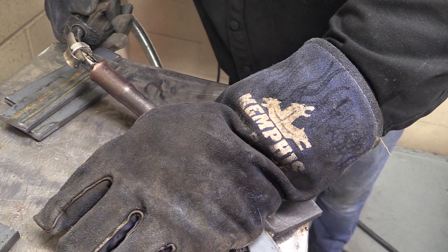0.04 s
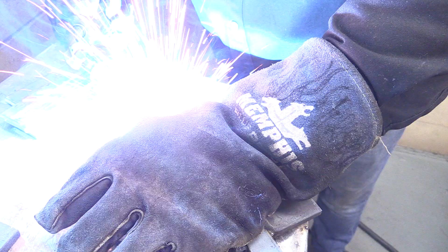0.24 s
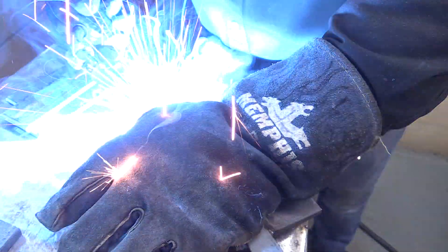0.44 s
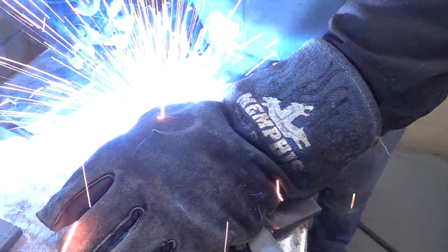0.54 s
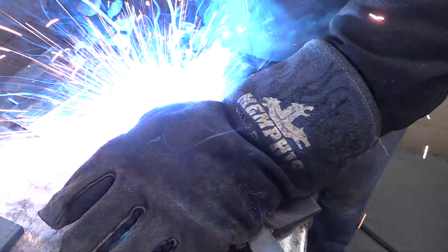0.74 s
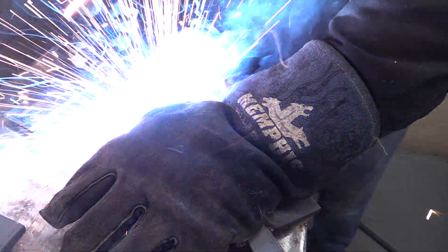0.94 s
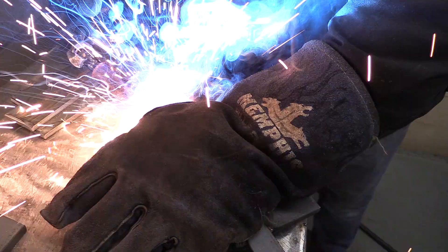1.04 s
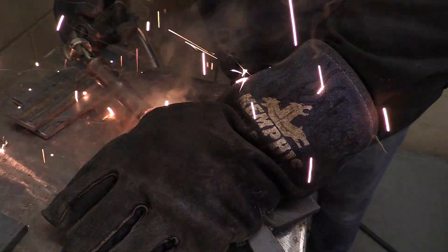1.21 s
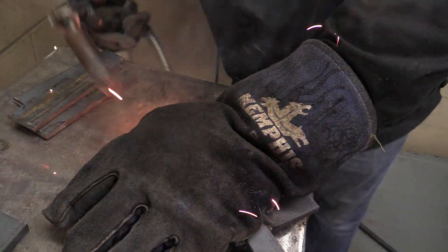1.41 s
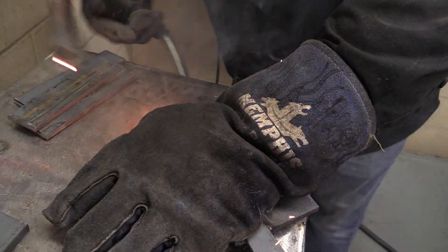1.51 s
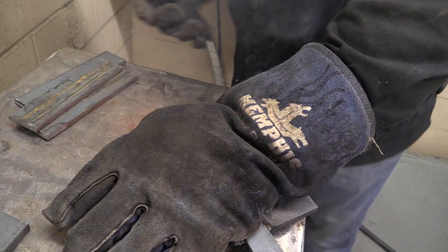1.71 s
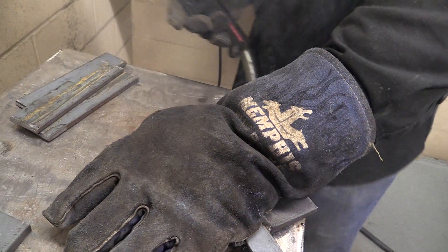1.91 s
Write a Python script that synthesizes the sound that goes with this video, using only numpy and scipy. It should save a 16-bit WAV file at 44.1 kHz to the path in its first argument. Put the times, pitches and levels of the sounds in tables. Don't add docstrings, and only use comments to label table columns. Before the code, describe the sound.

Close-up of a brief tack weld on steel plate: quiet fan hum, a tiny valve whistle and clunk, an explosive arc start, dense frying crackle, abrupt stop, then soft fading hiss and dry metallic ticks in a small reverberant shop.

```python
import sys
import numpy as np
from scipy import signal
from scipy.io import wavfile
from scipy.ndimage import uniform_filter1d

SR = 44100
rng = np.random.default_rng(int(sys.argv[2]) if len(sys.argv) > 2 else 0)


def store_pcm(level_fs):
    pcm = np.round(np.clip(level_fs, -1, 1) * 32767).astype(np.int16)
    wavfile.write(sys.argv[1], SR, np.atleast_2d(pcm).T)


def elevation(decibels):
    levels = np.asarray(decibels, float)
    return 10 ** (levels / 20)


N = 85995

# (time [s], shorts so far [count])
SHORT_CLOCK = [(0.2702, 0), (0.2999, 4), (0.3872, 16), (0.4285, 21), (0.5574, 36), (0.6357, 45),
               (0.6864, 51), (0.744, 58), (0.7853, 63), (0.7972, 64), (0.816, 66), (0.8587, 71),
               (0.8893, 75), (0.9482, 82), (0.9972, 88), (1.0708, 97), (1.1256, 104)]
# (time [s], pop level [dB], crack level [dB])
ARC_POWER = [(.275, -24.5, -40), (.36, -26.5, -19.5), (.46, -18, -21), (.55, -21.5, -9.5),
             (.72, -18.5, -9.5), (.765, -18.5, -13), (.84, -20, -14.5), (1.06, -16.5, -16.5),
             (1.13, -20.5, -28.5)]
# (time [s], crack level [dB], thump level [dB], fizz decay [s])
ARC_STRIKE = [
    (0.2442, 8.5, -11, 0.0044),
    (0.2463, 5, -1.5, .002),
    (0.263, 8, -14, 0.0012),
    (0.269, 12.5, -29, 0.0023),
    (.2803, -9, -9.5, .0006),
    (0.2859, -5.5, -25.5, .0006),
    (0.2957, 0, -42, .001),
]


def evened(x):
    return x / np.sqrt(np.mean(x ** 2) + 1e-20)


def read(points, hz):
    f, value = np.transpose(points)
    return np.interp(np.log(hz + 1), np.log(f + 1), value)


def curve(rows, t, axis=1):
    return np.interp(t, np.array(rows)[:, 0], np.array(rows)[:, axis])


def colour(x, points):
    hz = abs(np.fft.fftfreq(4096, 1 / SR))
    log_gain = np.log(elevation(read(points, hz)))
    taps = np.fft.ifft(np.exp(np.conj(signal.hilbert(log_gain)))).real[:2048]
    return signal.oaconvolve(x, taps / np.linalg.norm(taps))[:len(x)]


def resonate(x, hz, width):
    r = np.exp(-np.pi * width / SR)
    return signal.lfilter([1 - r, 0, r - 1], [1, -2 * r * np.cos(2 * np.pi * hz / SR), r * r], x)


def train(s, size):
    return np.bincount(np.round(s * SR).astype(int), size, N)[:N]


def spark(s, size, fizz_s):
    clicks = train(s, size)
    decay = np.exp(-1 / (fizz_s * SR))
    fizz = signal.lfilter([1], [1, -decay], clicks) * rng.standard_normal(N)
    return clicks + elevation(-12) * fizz


def shorts():
    # (time [s], timing scatter [ms], crack lag [ms])
    steadiness = [(.27, .07, 1.6), (.53, .09, 1.2), (.57, .4, .6), (.8, .5, .5), (.95, .4, .5),
                  (1.13, .25, .6)]
    s, count = np.transpose(SHORT_CLOCK)
    even = np.interp(np.arange(count[-1] + 1), count, s)
    smooth = uniform_filter1d(even, size=3)[1:-1]
    even = np.r_[even[0], smooth, even[-1]][1:]
    scatter = curve(steadiness, even) / 1000
    lag = curve(steadiness, even, axis=2) / 1000
    return even, scatter, lag, rng.standard_normal((len(even), 5))


def cracks(pop_s, even, lag, chance):
    # (time [s], peak level [dB])
    hard_breaks = [(0.3087, -3), (0.3445, -3), (0.3672, -6), (0.4306, -4), (0.4647, -6), (0.5075, -3),
                   (0.5498, 0), (0.5832, -1), (0.6084, -1), (0.6179, -1), (0.6269, -2), (0.6681, 0),
                   (0.703, -1), (0.7111, 0), (0.7358, -1), (0.7441, -3), (0.7972, -2), (0.8333, 0),
                   (0.8418, 0), (0.8586, -1), (0.9062, -4), (0.9147, -2), (0.9479, -3), (0.9559, -2),
                   (0.9899, -2), (1.0048, -3), (1.0131, -1), (1.0537, -2), (1.0621, -3), (1.0782, -4)]
    s = pop_s + lag + 0.00035 * chance[:, 2]
    db = curve(ARC_POWER, even, axis=2) + 14.5 + 4.5 * chance[:, 3]
    hard_s, hard_db = np.transpose(hard_breaks)
    near = abs(s[:, None] - hard_s).argmin(0)
    s[near] = hard_s
    db[near] = hard_db + 5.5
    db[:3] -= 12
    return s, db


def nozzle_ring(sparks):
    # (frequency [Hz], width before widening 4.5 times [Hz], level [dB])
    nozzle_modes = [(2400, 53, -3.5), (3140, 76, 4), (3140, 130, -7), (4490, 174, -6), (4470, 53, -10.5),
                    (6070, 43, -8.5), (7200, 81, -14.5)]
    return sum(elevation(db) * resonate(sparks, hz, 4.5 * width) for hz, width, db in nozzle_modes)


def arc():
    # (frequency [Hz], level [dB])
    pop_spectrum = [(40, -43.5), (110, -12), (250, -6.5), (480, 1.5), (600, -0.5), (830, 7), (1200, -6),
                    (2800, -5.5), (5000, -32.5)]
    # (frequency [Hz], level [dB])
    crack_spectrum = [(500, -33), (1300, -9.5), (2300, -2), (3400, -6.5), (4000, -22), (6500, -13),
                      (10000, -18.5), (15500, -13.5)]
    spit_decay_s, bench_echo_s, bench_echo_db = .0018, .0024, -7.5

    even, scatter, lag, chance = shorts()
    pop_s = even - .0006 + scatter * chance[:, 0]
    pop_db = curve(ARC_POWER, even) + 3 + 7400 * scatter * chance[:, 1]
    pops = train(pop_s, elevation(pop_db))

    crack_s, crack_db = cracks(pop_s, even, lag, chance)
    sparks = spark(crack_s, elevation(crack_db), .0013)
    spit_db = .5 * crack_db - 36 + 11 * chance[:, 4]
    spit = spark(crack_s, elevation(spit_db), spit_decay_s)

    thumps = np.zeros(N)
    for at, strike_db, thump_db, fizz_s in ARC_STRIKE:
        when = np.array([at])
        sparks += spark(when, elevation([strike_db]), fizz_s)
        spit += spark(when, elevation([-3]), spit_decay_s)
        thumps += train(when, elevation([thump_db]))

    x = 11 * colour(pops, pop_spectrum)
    x += 0.55 * colour(sparks, crack_spectrum)
    x += 2.25 * elevation(-1.5) * nozzle_ring(sparks)
    x += 25 * resonate(thumps, 480, 330) + 12 * resonate(thumps, 244, 350)
    x += resonate(spit, 12200, 3200)
    return x + elevation(bench_echo_db) * np.roll(x, round(bench_echo_s * SR))


def arc_column():
    # (time [s], first partial level [dB], second partial level [dB])
    breathing = [(.27, -64, -52), (.29, -42, -35), (.42, -42.5, -34.5), (.55, -41, -43.5), (.7, -37, -37),
                 (.8, -45, -40.5), (1.1, -43, -39.5), (1.13, -60, -39), (1.14, -80, -80)]
    t = np.arange(N) / SR
    turns = uniform_filter1d(curve(SHORT_CLOCK, t), size=400)
    x = np.zeros(N)
    for k in (1, 2):
        x += elevation(curve(breathing, t, axis=k)) * np.sqrt(2) * np.sin(2 * np.pi * k * turns)
    return x * (t > SHORT_CLOCK[0][0])


def gas_valve():
    start_s, length_s, whistle_hz, whistle_db = .183, .0195, 2550, -36
    t = np.arange(N) / SR
    gate = np.clip(np.minimum(t - start_s, start_s + length_s - t) / .002, 0, 1)
    return elevation(whistle_db) * gate * np.sin(2 * np.pi * whistle_hz * t)


def contactor():
    # (time [s], level [dB])
    knocks = [
        (.2113, -19),
        (.2338, -26),
    ]
    s, db = np.transpose(knocks)
    knock = spark(s, -elevation(db), .003)
    return 9 * resonate(knock, 850, 450) + 4 * resonate(knock, 1500, 600)


def gas():
    # (frequency [Hz], level [dB])
    hiss_spectrum = [(300, -12.5), (1500, 4.5), (3200, -6), (4500, -5), (7000, -3.5), (10000, -8),
                     (13500, -7.5), (15500, -31)]
    # (time [s], level [dB])
    hiss_level = [(.199, -74), (.204, -30.5), (.24, -26.5), (.26, -23), (.5, -27.5), (1.125, -23),
                  (1.14, -39), (1.22, -67)]
    # (frequency [Hz], level [dB])
    trail_spectrum = [(600, -18), (1500, 4.5), (3000, -4.5), (6000, -13.5), (9500, -15), (11500, -31),
                      (15500, -44)]
    # (time [s], level [dB])
    trail_level = [(1.1, -65), (1.15, -36.5), (1.3, -45), (1.5, -46.5), (1.75, -48.5), (1.95, -50)]
    t = np.arange(N) / SR
    flicker = evened(uniform_filter1d(rng.standard_normal(N), 300))
    hiss = colour(rng.standard_normal(N), hiss_spectrum) * elevation(curve(hiss_level, t) + 3.7 * flicker)
    trail_db = curve(trail_level, t) - 60 * (t < trail_level[0][0])
    return hiss + colour(rng.standard_normal(N), trail_spectrum) * elevation(trail_db)


def cooling_ticks():
    # (time [s], level [dB], frequency [Hz])
    ticks = [
        (1.602, -37, 6000),
        (1.6065, -31, 5500),
        (1.613, -39, 7000),
        (1.641, -47, 7000),
        (1.696, -42, 8000),
        (1.716, -33, 9300),
        (1.857, -39, 9000),
        (1.907, -40, 9000),
    ]
    x = np.zeros(N)
    for at, db, hz in ticks:
        x += 3 * resonate(spark(np.array([at]), elevation([db]), 0.00041), hz, 2500)
    return x


def shop():
    # (frequency [Hz], level [dB])
    fan_spectrum = [(30, -37), (120, -26), (200, -12), (350, -3), (800, -1.5), (2400, -23.5), (6000, -36.5),
                    (15500, -36)]
    # (time [s], level [dB])
    fan_level = [(0, -43), (.2, -39), (1.3, -57.5), (1.6, -52.5), (1.95, -46.5)]
    # (frequency [Hz], width [Hz], level [dB])
    hum_bands = [(254, 11.2, -54.5), (351, 16, -53), (451, 17, -55.5), (759, 210, -51), (1000, 81, -52.5)]
    t = np.arange(N) / SR
    swell = evened(uniform_filter1d(rng.standard_normal(N), 3000))
    x = colour(rng.standard_normal(N), fan_spectrum) * elevation(curve(fan_level, t) + 0.23 * swell)
    x += elevation(-65.5 + 5.5 * swell) * evened(resonate(rng.standard_normal(N), 53, 88))
    for hz, width, db in hum_bands:
        x += elevation(db) * evened(resonate(rng.standard_normal(N), hz, width))
    return x


def room(x):
    # (frequency [Hz], time to fall 60 dB [s])
    decay_times = [(200, 0.18), (600, 0.45), (1500, 0.21), (4000, 0.13), (10000, 0.13)]
    taps = np.zeros(SR)
    at = np.arange(300, SR - 20, 20)
    taps[at + rng.integers(0, 20, len(at))] = rng.choice([-1., 1.], len(at))
    hz, t, z = signal.stft(taps, SR, nperseg=256)
    fade = elevation(-60 * t / read(decay_times, hz)[:, None])
    tail = signal.istft(z * fade, SR, nperseg=256)[1]
    return signal.fftconvolve(x, tail / np.linalg.norm(tail))[:N]


def scene():
    near = arc() + gas_valve() + contactor() + gas() + cooling_ticks()
    return (near + arc_column() + elevation(-11.5) * room(near) + shop())[None]


def top_cut(x):
    return signal.sosfilt(signal.butter(12, 15690, fs=SR, output="sos"), x)


def record(dry):
    ceiling, strike_ceiling, catch_up_s = 1, 1.05, .04
    late = np.maximum(np.arange(N) / SR - ARC_STRIKE[3][0], 0)
    top = ceiling + (strike_ceiling - ceiling) * np.exp(-late / catch_up_s)
    limited = dry / (1 + (dry / top) ** 4) ** 0.17
    return top_cut(limited)


dry = scene()
out = record(dry)
store_pcm(out)
```